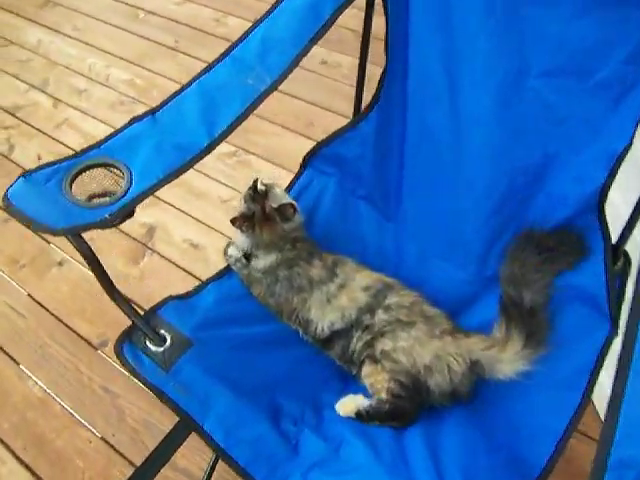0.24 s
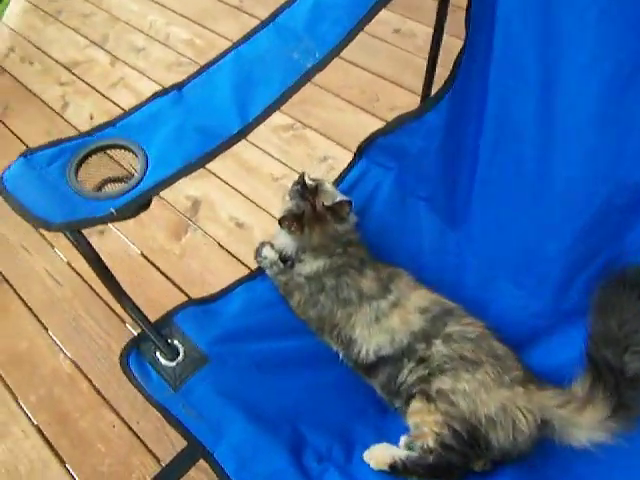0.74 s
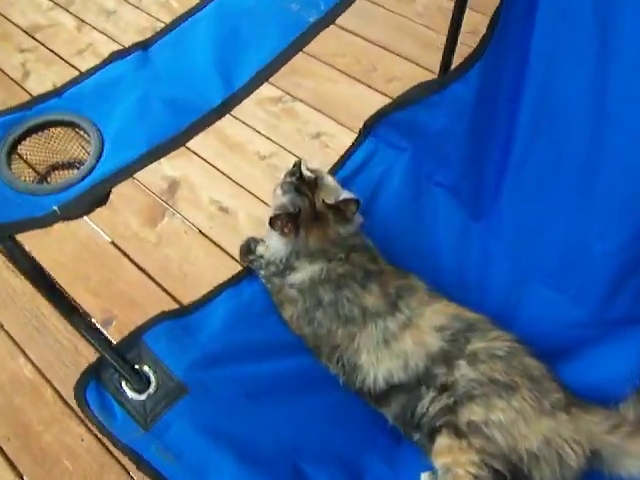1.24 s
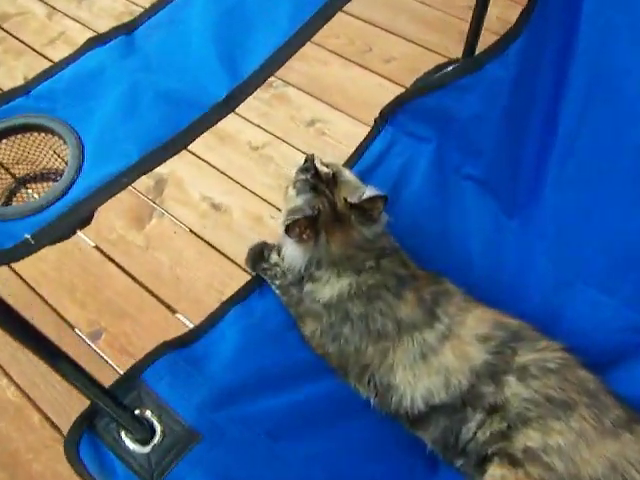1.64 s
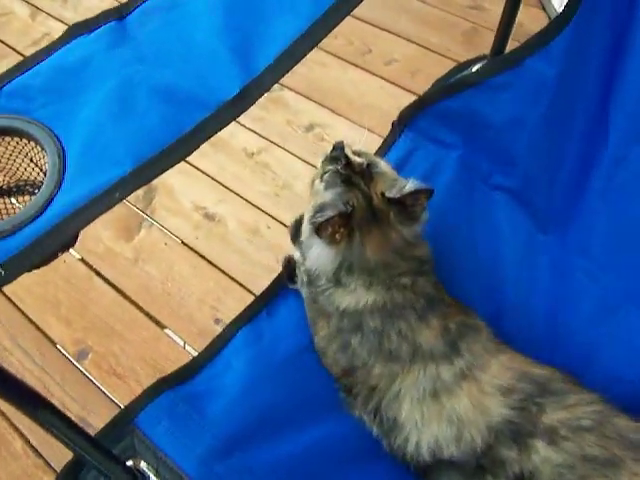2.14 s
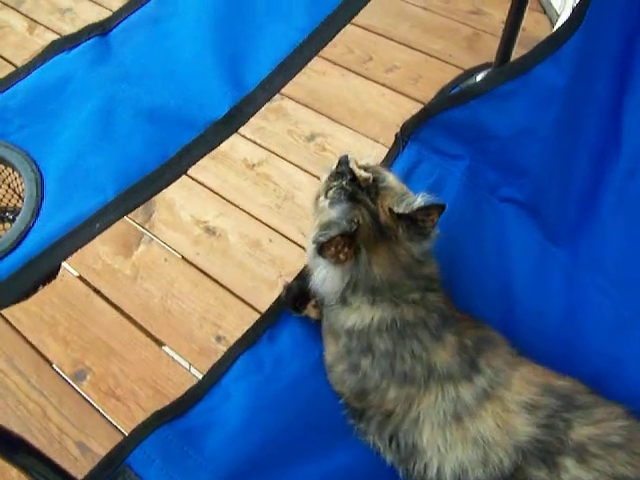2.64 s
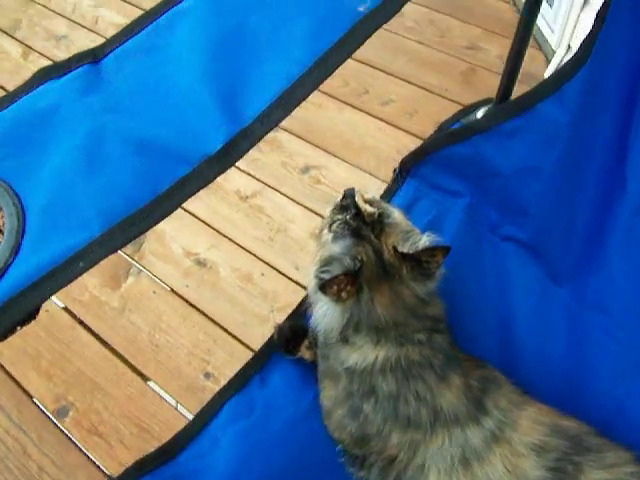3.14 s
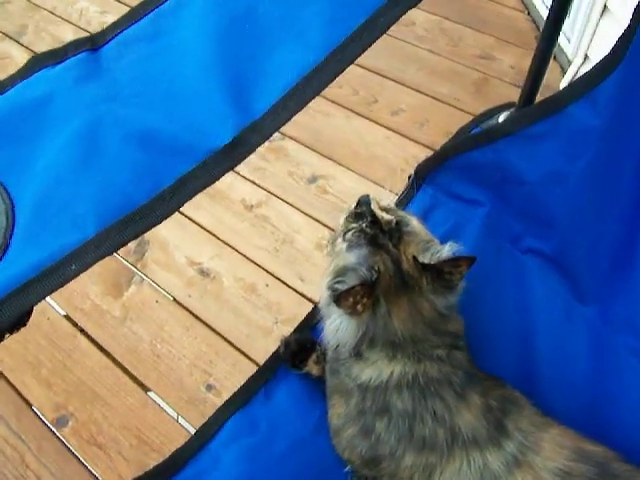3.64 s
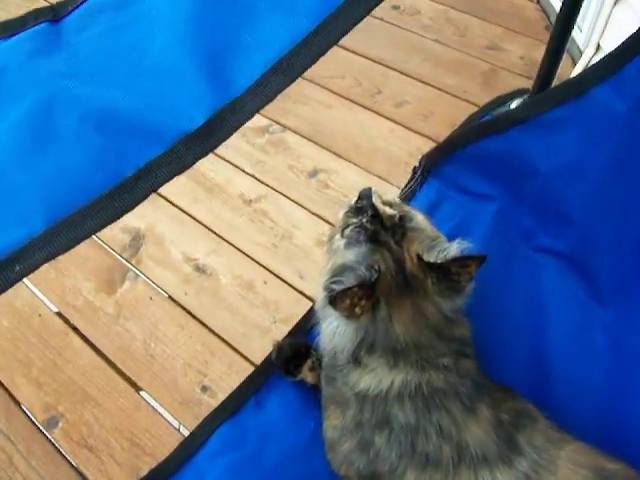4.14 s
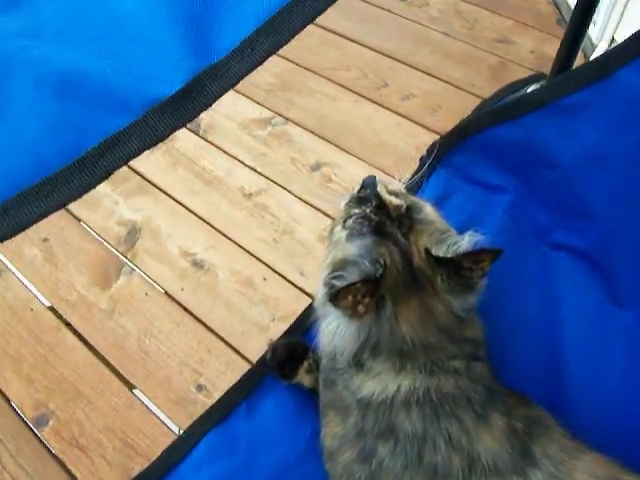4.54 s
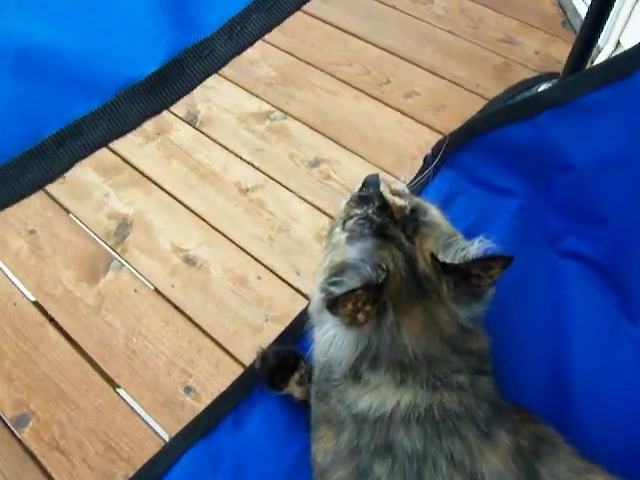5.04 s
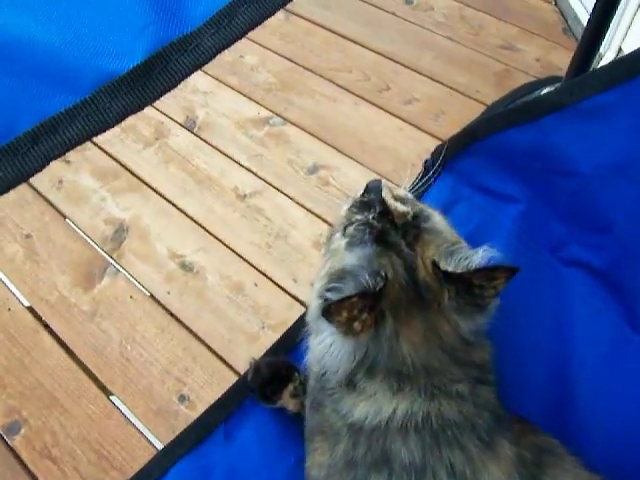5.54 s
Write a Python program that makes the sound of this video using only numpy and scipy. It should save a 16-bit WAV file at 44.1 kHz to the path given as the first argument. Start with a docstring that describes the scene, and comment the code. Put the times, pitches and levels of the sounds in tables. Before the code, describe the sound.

Outdoors on a wooden deck, a cat close to a handheld microphone chatters in short, creaky, mostly falling syllables, with wet jaw clicks, little puffs and two brief mews. A canvas chair pops and creaks early on, and the deck takes a single knock. Sparrows twitter faintly farther off throughout, with a few closer peeps midway. Low wind gusts bump the microphone over a soft outdoor rumble.

```python
"""Cat chattering at sparrows

A cat on a canvas chair chatters and mews (rough vocal fold pulses through throat resonances) and clicks its
jaw. Sparrows whistle and twitter, the canvas creaks by stick-slip, and the wooden deck takes one knock. Wind
buffets the microphone of a handheld camera, and thin steady tones sound faintly."""
import sys
import numpy as np
from scipy import signal
from scipy.fft import rfft, irfft
from scipy.io import wavfile
from scipy.ndimage import uniform_filter1d

SR = 44100
rng = np.random.default_rng(int(sys.argv[2]) if len(sys.argv) > 2 else 0)


def transcribe(u):
    """Save the signal u as a 16-bit wav file named by the first command-line argument.

    u: samples, shape (n,) or (channels, n), limited to [-1, 1]; the rate is SR.
    q: integer samples, one column per channel.
    """
    v = np.clip(np.atleast_2d(u).T, -1, 1)
    q = np.round(v * 32767).astype(np.int16)
    wavfile.write(sys.argv[1], SR, q)


N = 255292


def gain(db):
    """Decibels to amplitude."""
    return 10 ** (np.asarray(db) / 20)


def unit_rms(x):
    """Scale to rms 1."""
    return x / np.sqrt(np.mean(x ** 2) + 1e-20)


def add(mix, start_s, sound):
    """Mix a sound in at start_s."""
    part = mix[max(round(start_s * SR), 0):][:len(sound)]
    part += sound[:len(part)]


def resonate(x, hz, width_hz):
    """Unity-gain resonance, two stages for dark valleys: shift hz to zero, smooth, shift back."""
    carrier = np.exp(2j * np.pi * np.cumsum(hz * np.ones(len(x))) / SR)
    pole = np.exp(-np.pi * abs(width_hz) / SR)
    for _ in range(2):
        x = 2 * (carrier * signal.lfilter([1 - pole], [1, -pole], x / carrier)).real
    return x


def glide(length_s, start_hz, mid_hz, end_hz):
    """Parabola through three pitches."""
    u = np.linspace(-1, 1, round(length_s * SR))
    return mid_hz + (end_hz - start_hz) / 2 * u + ((end_hz + start_hz) / 2 - mid_hz) * u ** 2


def ring(modes):
    """Decaying modes of a struck object, neighbours in opposite phase, peak 1."""
    t = np.arange(SR // 5) / SR
    tones = sum((-1) ** k * gain(db - 60 * t / t60_s) * np.sin(2 * np.pi * hz * t)
                for k, (hz, db, t60_s) in enumerate(modes))
    return tones / abs(tones).max()


def coloured_noise(spectrum):
    """Noise of rms 1 shaped by (f/Hz, level/dB) points."""
    hz, db = np.transpose(spectrum)
    bin_db = np.interp(np.log(np.fft.rfftfreq(N, 1 / SR) + 1), np.log(hz + 1), db)
    return unit_rms(irfft(rfft(rng.standard_normal(N)) * gain(bin_db), N))


# gust envelope: t/s, relative level/dB
GUSTS = [(0.0, -46.5), (1.06, -42.5), (1.1, -32.5), (1.178, -45.5), (1.4, -25.5), (1.55, -25), (1.61, -47),
         (2.23, -36.5), (2.27, -23.5), (2.43, -46.5), (3.08, -34), (3.1, -43), (4.921, -49), (5.08, -29.5),
         (5.272, -46.5), (5.64, -40.5), (5.708, -30), (5.79, -37)]
# buffet spectrum: f/Hz, relative level/dB
BUFFET_SPECTRUM = [(8.8, -42.5), (15, -2.5), (62, -1.5), (131, -15), (185, -32), (210, -32.5), (400, -39.5),
                   (520, -62), (880, -120)]


def wind():
    """Gusts on the microphone: lumpy low pressure swings."""
    gust_db = np.interp(np.arange(N) / SR, *np.transpose(GUSTS))
    return gain(gust_db - 1.82) * coloured_noise(BUFFET_SPECTRUM)


# ambient spectrum: f/Hz, relative level/dB
AIR_SPECTRUM = [(24, -41.5), (40, -18), (124, 0.5), (173, -5), (294, -8.5), (448, -17.5), (1040, -21),
                (1690, -25), (3020, -24), (8000, -31), (10400, -44.5), (17600, -120)]


def air():
    """Steady outdoor rumble and hiss."""
    return gain(-46.5) * coloured_noise(AIR_SPECTRUM)


# whine tones: f/Hz, rms level/dB
WHINE_TONES = [(2002, -74), (7986, -74), (8014, -74)]


def whine():
    """Thin steady tones."""
    t = np.arange(N) / SR
    return sum(gain(db) * np.sqrt(2) * np.sin(2 * np.pi * hz * t) for hz, db in WHINE_TONES)


def bird_note(db, length_s, start_hz, mid_hz, end_hz, warble_hz):
    """Gliding whistle; more pitch warble brings more level flutter and a wider rasp."""
    hz = glide(length_s, start_hz, mid_hz, end_hz)
    noise = rng.standard_normal((3, SR // 5))
    warble, flutter = (unit_rms(uniform_filter1d(uniform_filter1d(row, 130), 130))[:len(hz)]
                       for row in noise[:2])
    harshness = 1 - 1 / (1 + (warble_hz / 80) ** 2)
    tone = np.sqrt(2) * np.sin(2 * np.pi * np.cumsum(hz + 0.609 * warble_hz * warble) / SR)
    rasp = unit_rms(resonate(noise[2, :len(hz)], hz, 7 * warble_hz))
    sound = tone * gain(2.5 * harshness * flutter) + harshness * gain(-0.3) * rasp
    return gain(db) * sound * signal.windows.tukey(len(hz), 0.6)


# note shapes: length/s, start f/Hz, mid f/Hz, end f/Hz, warble/Hz
RISING_NOTE = (.065, 5900, 6230, 6370, 60)
FALLING_NOTE = (.072, 7650, 6500, 3900, 190)
# phrase notes: delay/s, relative level/dB, then a note shape
PHRASE_NOTES = [(-.045, -3.5, 0.04, 5260, 6336, 8420, 250), (.002, -1, 0.023, 7600, 6030, 5750, 130),
                (.027, 0, 0.041, 5300, 5770, 6130, 110), (0.054, -1.5, .013, 6250, 6800, 7700, 110),
                (0.066, -14.5, .03, 6100, 5850, 5650, 160)]
# calls of each kind: t/s, level/dB
RISING_CALLS = [(2.512, -58), (2.728, -52), (2.901, -50)]
FALLING_CALLS = [(3.021, -50.5), (3.135, -51), (3.266, -53)]
PHRASE_CALLS = [(.045, -57), (.098, -55.5), (0.694, -53.5), (1.159, -60.5), (2.615, -50.5), (3.54, -47),
                (4.029, -52.5), (4.486, -51), (5.058, -49), (5.685, -50)]
# harsh notes: t/s, length/s, start f/Hz, end f/Hz, level/dB
TWITTER = [(0, 0.01, 2810, 3000, -39), (.055, 0.048, 4110, 3080, -47), (.058, 0.021, 5300, 4480, -52.5),
           (0.1, 0.0083, 3090, 2260, -43), (0.113, 0.041, 3400, 4240, -44), (.159, 0.0089, 3080, 2460, -41),
           (0.179, 0.096, 2910, 2234, -50), (0.153, 0.048, 5590, 4230, -57),
           (0.383, 0.023, 4440, 4680, -56.5), (0.398, 0.031, 4100, 3460, -54),
           (0.567, .03, 4100, 3290, -58.5), (1.045, 0.055, 5130, 4620, -54.5),
           (2.18, 0.073, 5390, 2920, -50), (2.259, 0.029, 3857, 4205, -45),
           (2.296, 0.03, 4310, 2814, -47.5), (2.362, 0.032, 4880, 4100, -49),
           (2.452, 0.034, 4800, 3990, -50), (2.815, 0.027, 4250, 3220, -49.5),
           (2.867, 0.042, 7600, 4950, -56.5), (2.928, 0.092, 5090, 2810, -51.5),
           (3.109, 0.041, 3900, 2910, -48), (3.099, 0.063, 5910, 5630, -50.5),
           (3.159, 0.025, 3660, 2930, -44.5), (3.391, 0.12, 3970, 6500, -59.5),
           (3.497, 0.063, 3850, 4600, -54.5), (3.985, 0.11, 3850, 3890, -53.5),
           (4.03, 0.018, 4380, 4220, -49.5), (4.335, .021, 2840, 3000, -57),
           (4.465, 0.022, 3600, 4600, -62), (4.47, 0.022, 4580, 2970, -57), (4.526, .03, 3005, 4500, -58.5),
           (4.976, 0.023, 3220, 3460, -53.5), (5.007, 0.029, 2740, 3280, -56),
           (5.024, 0.015, 2517, 2605, -51), (5.033, 0.022, 3680, 4880, -58),
           (5.055, 0.0099, 4700, 3650, -49), (5.119, 0.018, 3750, 4490, -54),
           (5.317, 0.035, 3730, 5140, -58.5), (5.357, 0.019, 5000, 3620, -53),
           (5.387, 0.064, 3370, 3400, -59), (5.657, 0.04, 4100, 4600, -54),
           (5.734, 0.031, 3660, 4250, -54.5)]


def sparrows():
    """Two repeated whistles, a five-note phrase and loose twitter."""
    out = np.zeros(N)
    for shape, calls in [(RISING_NOTE, RISING_CALLS), (FALLING_NOTE, FALLING_CALLS)]:
        for start_s, db in calls:
            add(out, start_s, bird_note(db, *shape))
    for start_s, db in PHRASE_CALLS:
        for delay_s, note_db, *shape in PHRASE_NOTES:
            add(out, start_s + delay_s, bird_note(db + note_db, *shape))
    for start_s, length_s, start_hz, end_hz, db in TWITTER:
        warble_hz = 197.5 + 0.235 * max(start_hz - end_hz, 0)  # falling notes are harsher
        mid_hz = (start_hz + end_hz) / 2
        add(out, start_s, bird_note(db, length_s, start_hz, mid_hz, end_hz, warble_hz))
    return out


# single slips: t/s, level/dB
CANVAS_POPS = [(0.272, -23), (0.288, -23.5), (0.3266, -16.5), (0.3302, -17), (0.3347, -19), (0.383, -26.5),
               (0.414, -28), (0.428, -44), (.447, -38), (0.457, -33), (0.817, -38), (0.929, -31),
               (0.952, -32), (0.963, -22.5), (0.978, -29)]
# spells of dense slips: start t/s, peak t/s, end t/s, peak level/dB, relative rasp level/dB
CANVAS_CREAKS = [(0.423, 0.43, 0.52, -44.5, -2), (0.649, 0.747, 0.8, -46.5, 1),
                 (0.894, 0.958, 1.07, -40.5, -8.5), (1.982, 2.035, 2.1, -35, -4)]
# cloth modes: f/Hz, relative level/dB, t60/s
CANVAS_MODES = [(270, -6, .018), (730, 0, .022), (1150, -5, .016), (2000, -9, .008)]


def canvas(slips_per_s=330, rasps_per_s=1500, edge_db=-11.5):
    """Stick-slip pops ring the stretched cloth, singly and in spells; the weave rasps on top."""
    t, creaks, slips = np.arange(N) / SR, np.zeros(N), np.zeros(N)
    cloth = ring(CANVAS_MODES)
    for start_s, db in CANVAS_POPS:
        add(slips, start_s, gain(db) * np.hanning(24) / 12)  # 0.5 ms slip
    pops = signal.oaconvolve(slips, cloth)[:N]
    sizes = gain(2.1 * np.minimum(rng.exponential(1, N), 4)) * rng.choice([-1., 1.], N)
    dense_slips = sizes * (rng.random(N) < slips_per_s / SR)
    drag = unit_rms(signal.oaconvolve(dense_slips, cloth)[:N])
    rasp = sizes * (rng.random(N) < rasps_per_s / SR)
    for hz, width_hz in [(2300, 3500), (2700, 6500)]:  # two broad one-pole resonances
        pole = np.exp((2j * hz - width_hz) * np.pi / SR)
        rasp = unit_rms(signal.lfilter([1], [1, -pole], rasp).real)
    for *times_s, db, rasp_db in CANVAS_CREAKS:
        spell_db = db + np.interp(t, times_s, [edge_db, 0, edge_db], left=-200, right=-200)
        creaks += gain(spell_db) * (drag + gain(rasp_db) * rasp)
    ticks = gain(10) * slips * rng.standard_normal(N)
    return creaks + pops + resonate(ticks, 2500, 2600)


# upper throat resonances: f/Hz, width/Hz, gain/dB, exponent of mouth opening on f
FORMANTS = [(2053, 380, -3.5, 0), (2620, 650, 1, 0.87), (3414, 980, 3, 0.92), (5720, 930, -13, 0.028)]


def throat(x, low_hz, low_db, mouth, formants=FORMANTS):
    """One low resonance plus upper formants, most of which rise as the mouth opens."""
    bands = [(low_hz, 0.55 * np.mean(low_hz), low_db)]
    bands += [(hz * mouth ** exponent, width_hz, db) for hz, width_hz, db, exponent in formants]
    return sum((-1) ** k * gain(db) * resonate(x, hz, width_hz)
               for k, (hz, width_hz, db) in enumerate(bands))


def puff(db, mouth, formants=FORMANTS):
    """Air hisses through the open mouth as the jaw lets go."""
    t = np.arange(SR // 10) / SR
    envelope = np.minimum(t / 0.002, 1) ** 2 * np.exp(-(t / 0.032) ** 2)
    hiss = throat(rng.standard_normal(len(t)), 850, -8, mouth, formants)
    return gain(db) * unit_rms(hiss) * envelope


# jaw and tongue clicks: t/s, level/dB, puff level/dB, mouth opening factor
JAW_CLICKS = [(0.341, -22, -44, 1), (.862, -32, -69, 1.1), (.9083, -38, -44, 1.07), (.9203, -33, -65, 1.17),
              (0.9723, -24, -51, 0.97), (2.418, -29.5, -61, 0.77), (2.431, -28, -42.5, 1.01),
              (2.6427, -31.5, -53, 0.97), (2.895, -32, -46, 1), (3.2955, -27, -47, 1.06),
              (3.3561, -23, -41, 1.06), (3.553, -30.5, -45, 1.03), (3.612, -21, -41, 1),
              (3.978, -23.5, -43.5, 1.06), (4.7216, -22, -44, 1.1), (4.779, -32.5, -46.5, 1.15),
              (5.509, -28, -41.5, 1.02)]


def jaw_clicks(snap_db=-20.5):
    """A wet contact tears over a few ms and rings the throat; a wide snap and a puff go with it."""
    out, t = np.zeros(N), np.arange(400) / SR
    for start_s, db, puff_db, mouth in JAW_CLICKS:
        smack = rng.standard_normal(len(t)) * np.exp(-t / 0.0008) * np.minimum(t / 0.0012, 1)
        click = throat(smack, 880, -1.5, mouth)
        snap = gain(snap_db) * smack / abs(smack).max()
        add(out, start_s, gain(db) * (click / abs(click).max() + snap))
        add(out, start_s, puff(puff_db, mouth))
    return out


def cat_voice(hz, db, roughness, low_hz, low_db, mouth, formants=FORMANTS):
    """Vocal fold pulses, uneven in spacing and size by the roughness, through the throat."""
    jitter, shimmer = rng.standard_normal((200, 2)).T  # one draw per cycle
    steady_cycle = (np.cumsum(hz) / SR).astype(int)
    cycles = np.cumsum(hz * np.exp(0.5 * roughness * jitter[steady_cycle % 200])) / SR
    sizes = gain(8 * roughness * shimmer[np.round(cycles).astype(int) % 200])
    pulses = sizes * sum(np.cos(2 * np.pi * k * cycles) for k in range(1, 16))
    air_leak = 0.17 * rng.standard_normal(SR // 5)[:len(hz)]
    return gain(db) * unit_rms(throat(pulses + air_leak, low_hz, low_db, mouth, formants))


# syllables: t/s, length/s, start f/Hz, mid f/Hz, end f/Hz, level/dB, roughness 0-1,
# low formant f/Hz, low formant gain/dB, mouth opening factor, puff level/dB
SYLLABLES = [(0.649, 0.053, 349, 394, 371, -41.5, .2, 1090, 3.5, 1.04, -45),
             (.942, .052, 604, 516, 507, -44, 0.25, 812, -24, 1.07, -49),
             (1.777, 0.035, 515, 417, 394, -37.5, 0.11, 810, 4.5, 1.02, -45),
             (1.866, 0.042, 598, 505, 437, -40, 0.12, 860, 6.5, 1.01, -48),
             (1.972, 0.055, 729, 660, 390, -37.5, .14, 850, 1, 0.96, -55),
             (2.565, 0.019, 418, 434, 430, -32, 0.24, 800, -2, 0.91, -47.5),
             (2.692, .024, 461, 396, 311, -34, 0.26, 760, -5.5, 0.86, -55),
             (2.719, 0.035, 662, 676, 596, -37, 0.03, 810, -5.5, 0.87, -54),
             (2.754, .011, 780, 815, 646, -36, 0.31, 930, 1, 0.93, -42.5),
             (3.024, 0.023, 780, 760, 760, -44, 0.03, 850, 8, 1.2, -43),
             (3.331, 0.023, 711, 545, 397, -35, 0.16, 810, 0.5, 0.95, -52),
             (5.519, 0.028, 623, 516, 436, -37, 0.38, 800, -4, 1.26, -45)]


def chatter(attack_s=0.008):
    """Short creaky syllables, mostly falling: the folds falter at the end, then a puff escapes."""
    out = np.zeros(N)
    for start_s, length_s, *pitches_hz, db, roughness, low_hz, low_db, mouth, puff_db in SYLLABLES:
        hz = glide(length_s, *pitches_hz)
        u = np.linspace(0, 1, len(hz))
        falter = 0.25 * u ** 5
        envelope = np.minimum(u * length_s / attack_s, 1) * np.minimum((1 - u) / 0.096, 1)
        add(out, start_s, envelope * cat_voice(hz, db, roughness + falter, low_hz, low_db, mouth))
        add(out, start_s + length_s, puff(puff_db, mouth))
    return out


# bird peeps: t/s, length/s, start f/Hz, mid f/Hz, end f/Hz, level/dB
PEEPS = [(0.823, 0.076, 2730, 2650, 2500, -56.5), (3.187, 0.052, 2600, 2890, 2450, -44.5),
         (3.637, 0.14, 2680, 2720, 2530, -55), (3.919, 0.065, 2750, 2600, 2640, -54.5),
         (4.043, 0.065, 2806, 2660, 2710, -35.5), (4.096, 0.033, 2600, 2570, 2650, -39)]


def peeps():
    """Low wavering whistles from close by."""
    out = np.zeros(N)
    for start_s, *shape, db in PEEPS:
        add(out, start_s, bird_note(db, *shape, warble_hz=50))
    return out


# one curve per mew: t/s, f/Hz, level/dB, roughness 0-1, low formant f/Hz, low formant gain/dB,
# mouth opening factor
MEW_CURVES = [
    [(1.06, 761, -52, 0.05, 748, -12, 1.2), (1.068, 739, -43, 0, 750, -15, 0.83),
     (1.102, 727, -42.5, 0.03, 740, -5.5, .9), (1.112, 690, -44.5, 0.04, 1400, -21, 1.01),
     (1.128, 639, -38, 0.02, 1550, -2.5, 0.96), (1.155, 624, -40, 0.02, 1550, 2, 1.03),
     (1.166, 468, -38.5, 0.2, 940, -6, 0.95), (1.188, 447, -35.5, 0.3, 950, -13, 0.99)],
    [(4.128, 701, -46, 0, 860, 5.5, 0.93), (4.145, 686, -39, 0.05, 950, -3.5, 0.82),
     (4.16, 661, -35, 0, 1015, -6, 0.93), (4.17, 607, -37, 0.06, 1010, -6.5, 0.97),
     (4.193, 472, -38.5, 0.22, 980, -5.5, 0.96)],
]
# puff after each mew: level/dB
MEW_PUFFS_DB = [-39.5, -50.5]
# resonances of the rounder mouth: columns as FORMANTS
MEW_FORMANTS = [(3210, 830, -3.5, 0.95), (3710, 860, -3, 1.07), (5320, 650, -15, 0.029)]


def mews():
    """The voice falls in pitch through a rounded mouth and ends in a puff."""
    out = np.zeros(N)
    for curve, puff_db in zip(MEW_CURVES, MEW_PUFFS_DB):
        times_s, *columns = np.transpose(curve)
        t = np.arange(times_s[0], times_s[-1], 1 / SR)
        controls = [np.interp(t, times_s, column) for column in columns]
        add(out, times_s[0], cat_voice(*controls, MEW_FORMANTS) * signal.windows.tukey(len(t), 0.08))
        add(out, times_s[-1], puff(puff_db, mouth=curve[-1][-1], formants=MEW_FORMANTS))
    return out


# blow on the deck: t/s, level/dB
KNOCKS = [(1.42, -17.5)]
# board ring and deck sag: f/Hz, relative level/dB, t60/s
BOARD_MODES = [(392, -4, 0.057), (705, -6.5, 0.05), (823, -4.5, 0.025), (1170, -15, 0.026),
               (1470, -17.5, 0.037)]
SAG_MODES = [(63, 0, 0.12)]


def deck_knock(sag_lead_s=0.0045):
    """The deck gives under a blow, then a sharp tick and the board's ring, shaken on by a rattle."""
    out, t = np.zeros(N), np.arange(2400) / SR
    for start_s, db in KNOCKS:
        rattle = gain(-27 - 60 * t / 0.11) * rng.standard_normal(len(t))
        tick = gain(db - 17 - 60 * t / 0.036) * rng.standard_normal(len(t))
        add(out, start_s - sag_lead_s, gain(db - 4) * ring(SAG_MODES))
        add(out, start_s, tick)
        add(out, start_s, -gain(db) * np.convolve(np.r_[1, rattle], ring(BOARD_MODES)))
    return out


def echoes(x, t60_s):
    """Random reflections from fences and walls: a unit-energy tail starting at 6 ms."""
    t = np.arange(SR // 2) / SR
    tail = rng.standard_normal(len(t)) * gain(-60 * t / t60_s) * (t > 0.006)
    return signal.oaconvolve(x, tail / np.linalg.norm(tail))[:N]


def scene():
    """Mono mix: near sources almost dry, sparrows reverberant, wind and air beneath."""
    near = chatter() + mews() + jaw_clicks() + canvas() + deck_knock() + peeps()
    far = sparrows()
    reflections = gain(-17) * echoes(near, t60_s=0.14) + gain(-3.5) * echoes(far, t60_s=0.3)
    return (near + far + reflections + wind() + air())[None]


def record(dry, rolloff_hz=7500, band_limit_hz=8950):
    """Treble roll-off, thin steady tones, then the band limit."""
    dull = signal.sosfilt(signal.butter(10, rolloff_hz, fs=SR, output="sos"), dry)
    lowpass = signal.firwin(511, band_limit_hz, window=("kaiser", 9), fs=SR)
    return signal.oaconvolve(dull + whine(), lowpass[None], "same")


dry = scene()
out = record(dry)
transcribe(out)
```